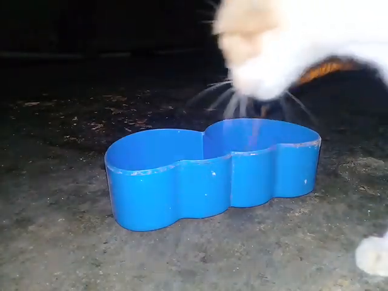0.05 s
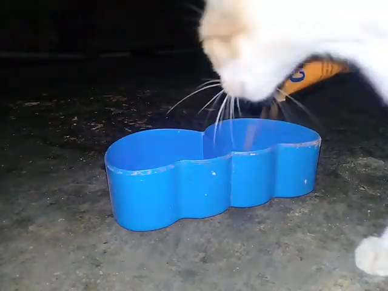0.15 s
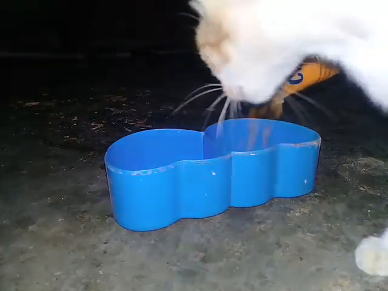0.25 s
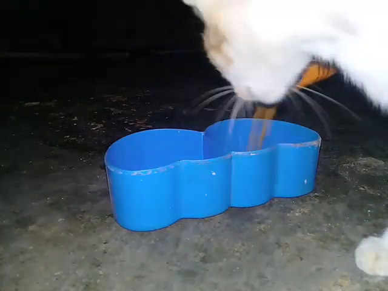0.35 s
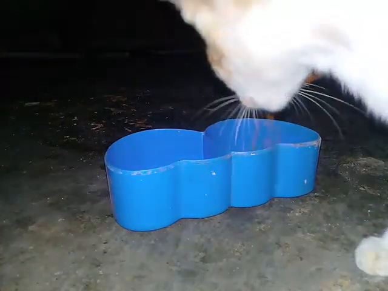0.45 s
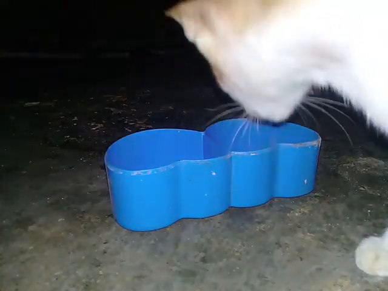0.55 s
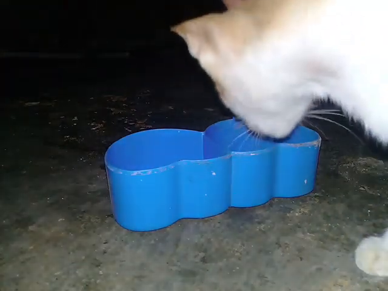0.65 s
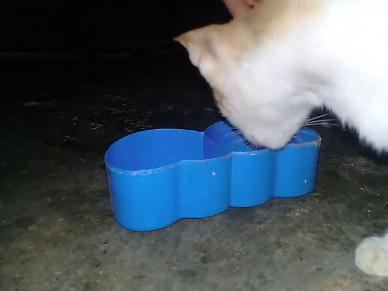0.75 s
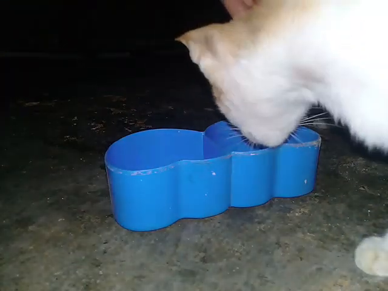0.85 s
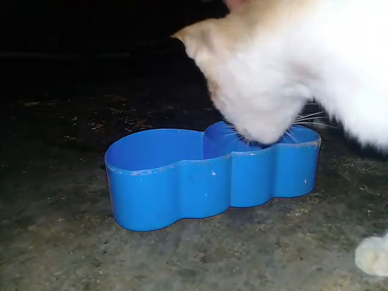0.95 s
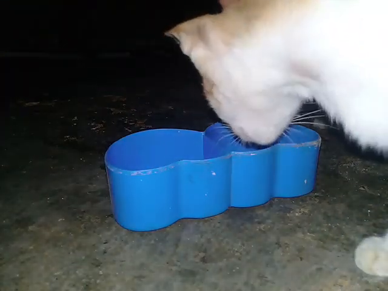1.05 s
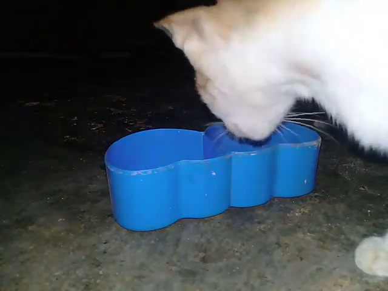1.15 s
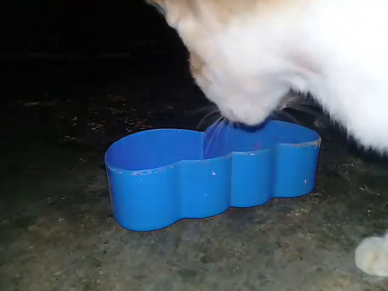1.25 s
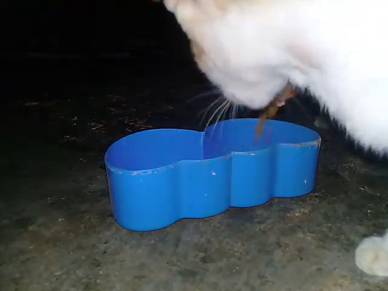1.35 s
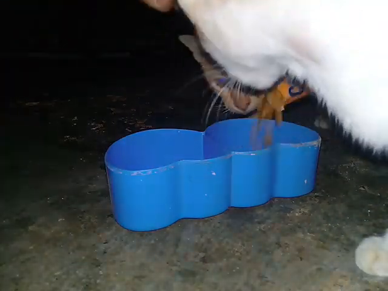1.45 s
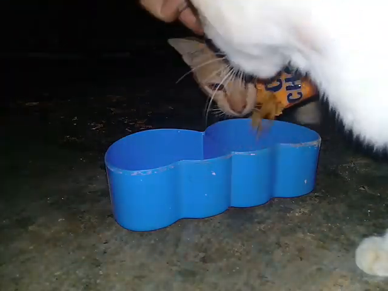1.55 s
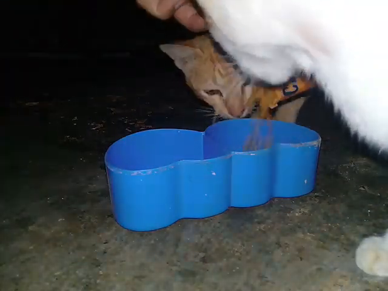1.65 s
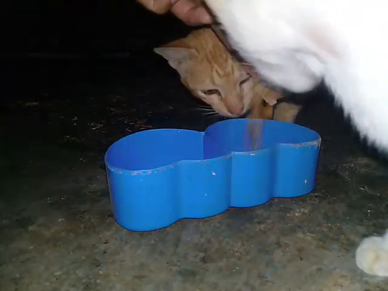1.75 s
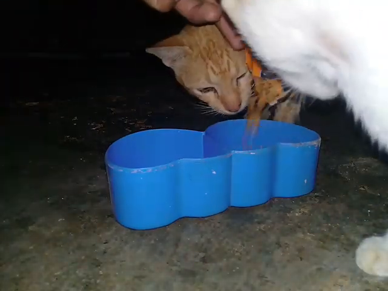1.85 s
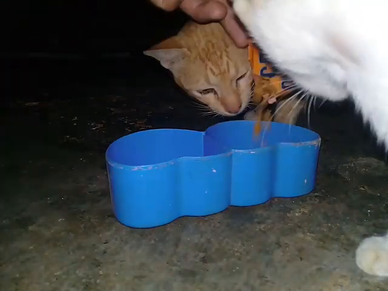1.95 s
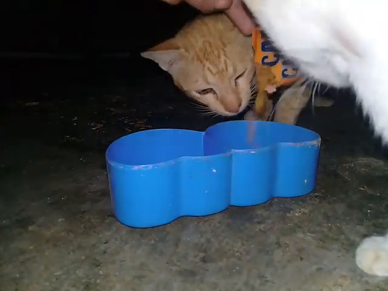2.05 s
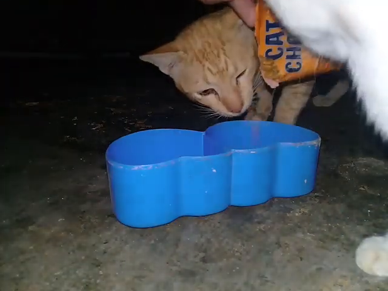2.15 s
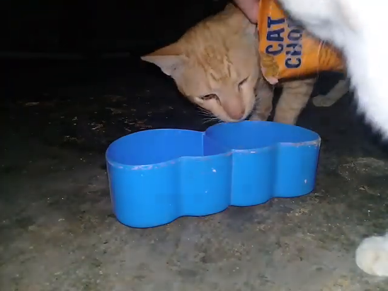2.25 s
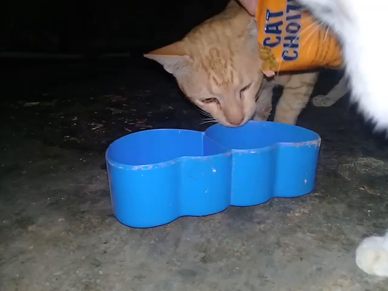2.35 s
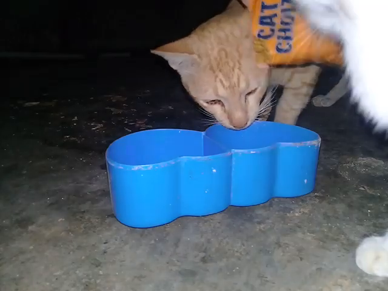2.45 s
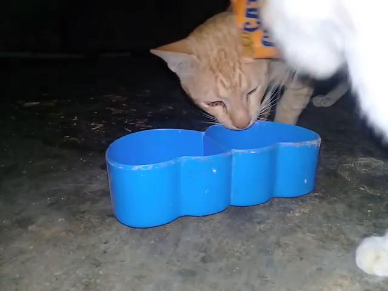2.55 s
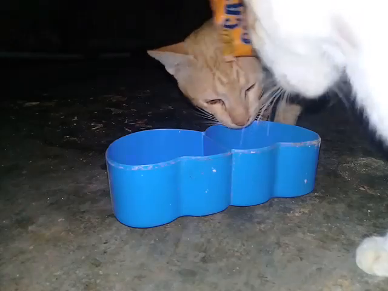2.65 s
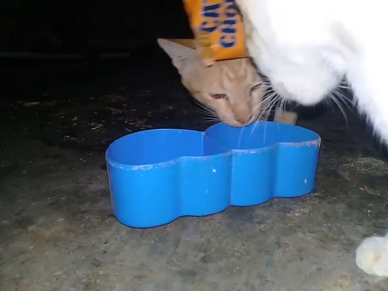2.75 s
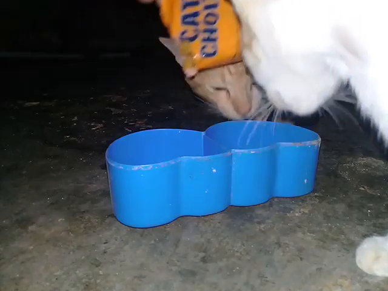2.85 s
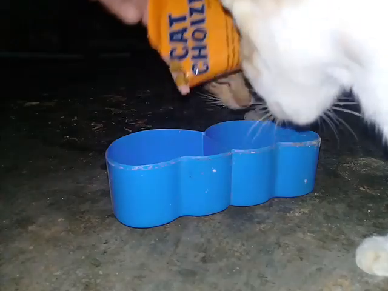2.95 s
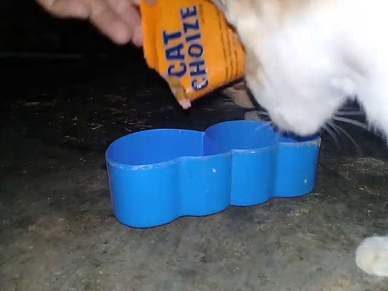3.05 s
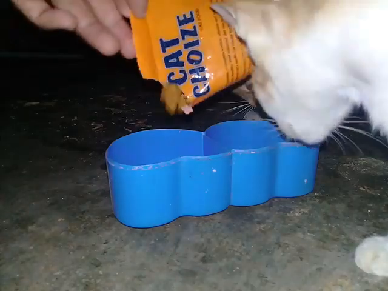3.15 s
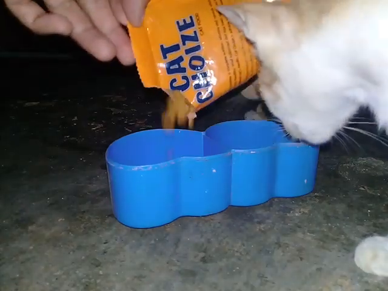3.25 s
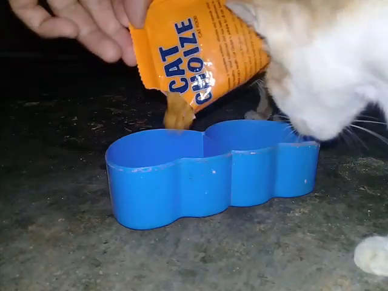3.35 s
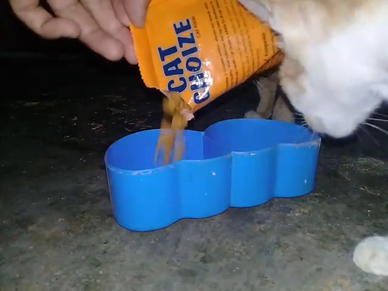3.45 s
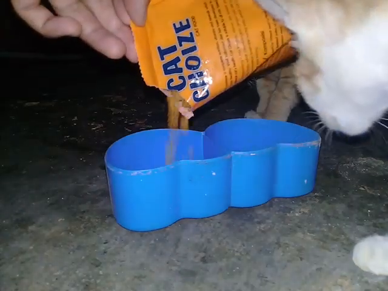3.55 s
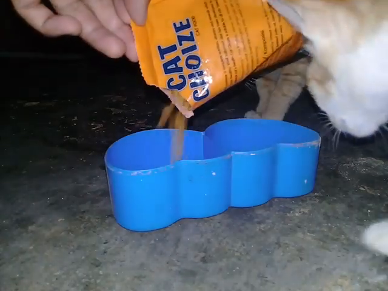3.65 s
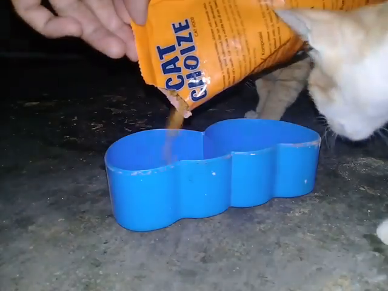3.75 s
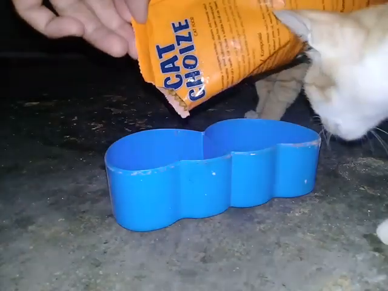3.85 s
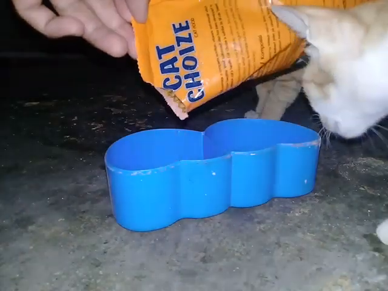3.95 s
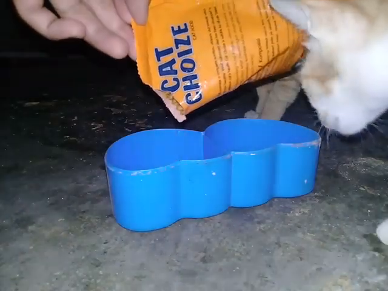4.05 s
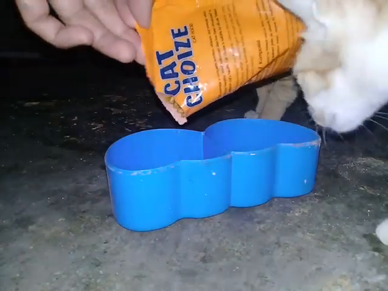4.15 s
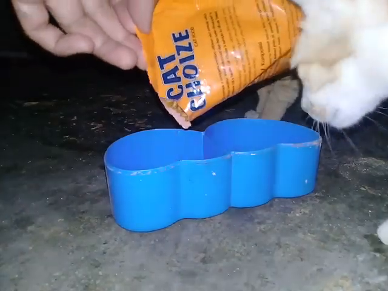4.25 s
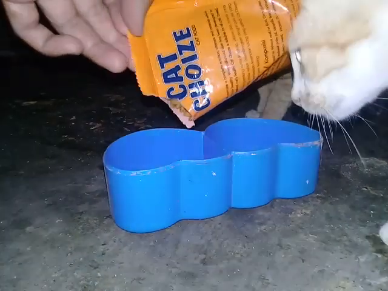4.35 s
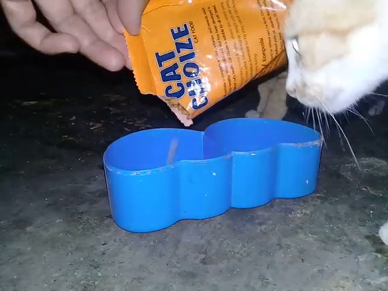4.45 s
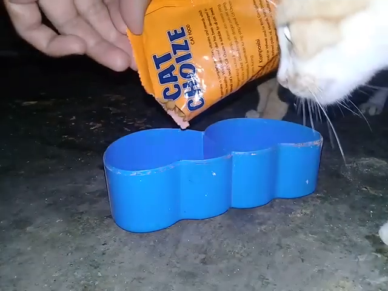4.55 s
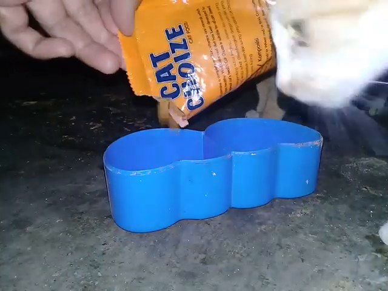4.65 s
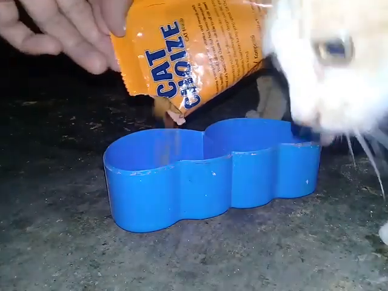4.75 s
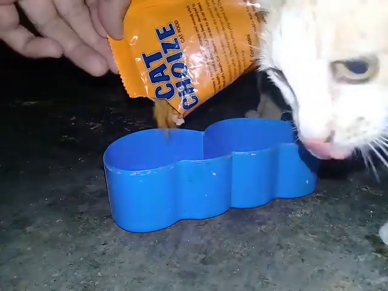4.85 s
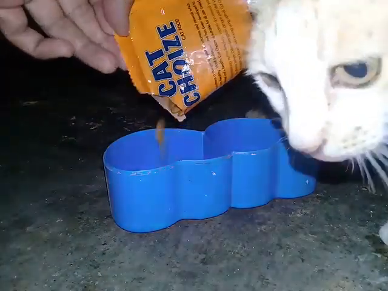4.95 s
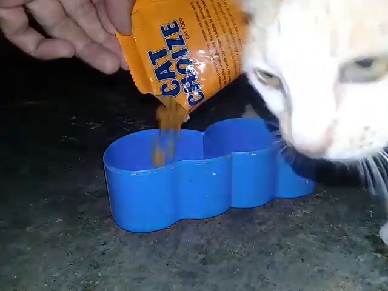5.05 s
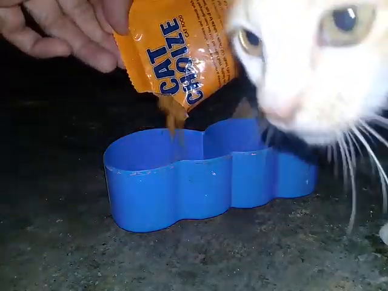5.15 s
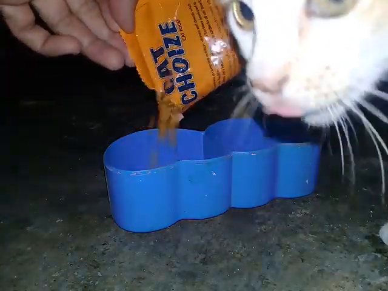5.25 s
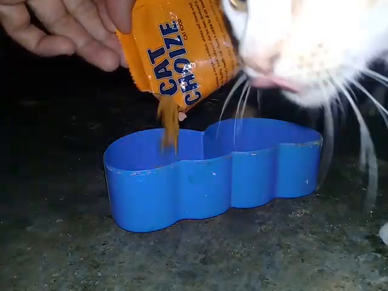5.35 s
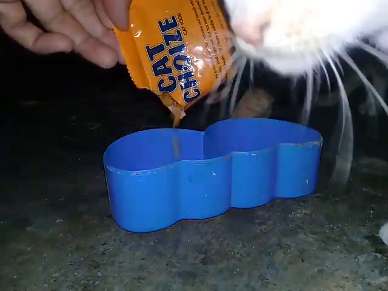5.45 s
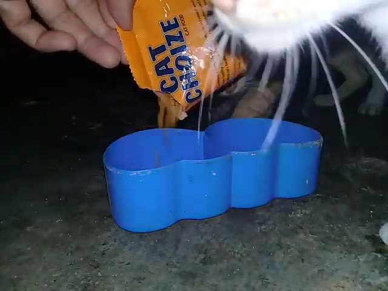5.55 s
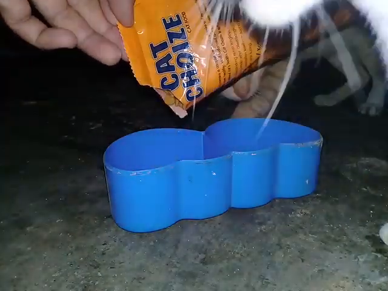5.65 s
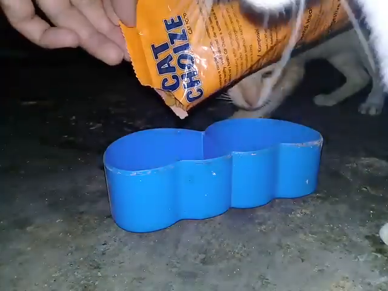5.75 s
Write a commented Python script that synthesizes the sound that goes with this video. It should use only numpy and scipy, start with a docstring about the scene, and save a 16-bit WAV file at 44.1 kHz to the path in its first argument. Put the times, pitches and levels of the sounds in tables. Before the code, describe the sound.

A plastic pouch rustles and crinkles while dry pellets rattle into one hard plastic cup, then another, with dull bumps and sharp snaps.

```python
"""From the start a far engine drones over low room noise, and a gripped plastic pouch rustles and crinkles.
Dry cat food soon drops into one plastic cup, then from about 3.3 s into a second: pellets click and ring it.
Streams of small hits patter and grow duller as food heaps up; the pouch gives dull bumps and snaps throughout.
Clicks, rustle and bumps are shaped noise; cup rings and engine are sines; a hard-walled room answers."""
import sys
import numpy as np
from scipy import signal
from scipy.fft import rfft, irfft
from scipy.io import wavfile
from scipy.ndimage import uniform_filter1d, minimum_filter1d

SR = 44100
rng = np.random.default_rng(int(sys.argv[2]) if len(sys.argv) > 2 else 0)


def unload_audio(sound):
    """Save the sound as a 16-bit wav file, at the path given as the first command line argument."""
    columns = np.transpose(np.atleast_2d(sound))
    # keep every value between -1 and 1, then stretch to whole-number steps
    steps = np.round(np.clip(columns, -1, 1) * 32767)
    wavfile.write(sys.argv[1], SR, steps.astype(np.int16))


N = 255780  # length in samples

# colour of the still air in the room: (frequency [Hz], relative level [dB])
AIR_SPECTRUM = [(25, -30), (50, -14), (80, -2), (130, 0), (220, -5.5), (330, -12), (450, -22.5),
                (700, -26.5), (1000, -35), (1600, -40), (7000, -43.5), (16000, -45.5)]
# a far engine pulling through its gears: (time [s], firing rate [Hz])
ENGINE_RATE = [(0, 81), (.45, 79), (.65, 91), (.95, 94), (1.5, 71), (2.9, 85), (3.15, 77), (4.7, 86),
               (5.8, 85)]
# the engine's tones: (multiple of the firing rate [], level at the start [dB])
ENGINE_TONES = [(3, -50), (4, -56)]
# the hand shifts its grip and the pouch rubs: (time [s], length [s], relative level [dB])
GRIPS = [(0, .62, -37.5), (.95, 0.97, -37.5), (2.5, 0.4, -69), (3.22, 0.13, -45.5), (3.33, 0.57, -39.5),
         (4.24, 0.011, -42.5), (4.43, 0.39, -43.5), (4.78, .45, -38.5), (5.3, .15, -34)]
# colour of the rubbing film: (frequency [Hz], relative level [dB])
RUSTLE_SPECTRUM = [(60, -26), (130, -2), (260, 4.5), (430, -6), (700, 5), (1400, -6), (3500, -13),
                   (6000, -25), (16000, -34.5)]
# colour of a snap or tiny tick of the film: (frequency [Hz], relative level [dB])
SNAP_SPECTRUM = [(400, -11), (1000, 2.5), (2300, 1), (3300, 4), (4500, 0), (7000, -12), (16000, -24)]
# single pellet hits that stand out from the patter, loud and soft: (time [s], relative level [dB])
SINGLE_PELLETS = [(0.141, -2), (0.191, -2.5), (0.219, -2.5), (0.232, -1), (0.256, -2), (0.291, -4),
                  (0.302, -3.5), (0.344, -1), (0.35, -4), (0.383, -2.5), (0.41, -5), (0.547, -3.5),
                  (0.569, -6), (0.64, -6), (0.734, -14.5), (0.994, -10.5), (1.059, -3.5), (1.086, -16.5),
                  (1.105, -4.5), (1.158, -3), (1.165, -2), (1.2, -6.5), (1.211, 0.5), (1.308, -10.5),
                  (1.377, -9.5), (1.471, -11), (1.495, -3.5), (1.627, -15), (1.946, -11.5), (1.996, -9),
                  (2.215, -17), (2.224, -16), (2.253, -21.5), (2.309, -23.5), (3.342, 4), (3.35, -3),
                  (3.372, -4), (3.387, -2.5), (3.421, -1.5), (3.432, 2.5), (3.528, 4), (3.538, 2.5),
                  (3.585, -5.5), (3.607, -3), (3.648, -8), (3.68, -4), (3.729, 0), (3.782, -1),
                  (3.818, -2.5), (3.843, -5.5), (3.868, -4), (3.894, -5.5), (3.915, -4.5), (3.964, -8),
                  (4.56, -9), (4.588, -8), (4.821, -8.5), (4.835, -6), (4.934, -10), (5.01, -6.5),
                  (5.028, -9), (5.067, -4.5)]
# colour of a pellet's click: (frequency [Hz], relative level [dB])
CLICK_SPECTRUM = [(100, -47), (430, -31), (650, -5), (1000, 0.5), (1400, 6), (2400, 9.5), (2900, 3),
                  (3250, -4.5), (4200, -3.5), (7000, -16), (11000, -18.5), (16000, -27.5)]
# resonances of the first cup: (frequency [Hz], width [Hz], relative level [dB])
# the decay treats any width below 70 Hz as 70 Hz, in both cups
RIGHT_CUP_MODES = [(670, 71, -13.5), (1372, 60, -1), (1590, 45, -13), (2310, 60, 7.5), (2546, 41, -5),
                   (2808, 36, 2), (3720, 240, 3), (4300, 250, -18)]
# dull bumps of the shaken pouch: (time [s], peak of the low thud [dB],
# hollow part against the thud, before a shared lift of 7 dB [dB])
BUMPS = [(0.279, -27, -3), (0.993, -23, -4.5), (1.014, -38.5, 9.5), (1.113, -21, -20), (1.263, -25, 2),
         (1.279, -32.5, 3), (1.71, -25.5, -3), (4.83, -23.5, -3.5), (5.316, -21, -4), (5.357, -31, -21),
         (5.478, -30.5, -3)]
# each tip of the pouch lets a slug of food slide out: (time [s], length [s], relative level [dB])
POURS = [(.28, .09, -29), (.39, .28, -18), (1.1, .24, -33), (1.52, .8, -22), (3.35, .03, -26),
         (3.435, .035, -19), (3.54, .18, -17), (3.78, .17, -26), (4.835, .055, -23.5), (4.94, .015, -32),
         (5.02, .04, -27), (5.19, .42, -28), (5.71, .025, -42)]
# the pouch buckles with a snap: (time [s], peak level [dB])
SNAPS = [(0.939, -24), (2.342, -27), (2.368, -28.5), (3.121, -54), (4.236, -35), (4.421, -33), (4.46, -27),
         (4.787, -16), (5.167, -19), (5.339, -11), (5.447, -20.5), (5.576, -20), (5.589, -14.5),
         (5.734, -32)]
# resonances of the second cup: (frequency [Hz], width [Hz], relative level [dB])
LEFT_CUP_MODES = [(633, 41, -16), (1280, 30, -4.5), (1649, 22, 2.5), (2100, 52, -5), (2850, 47, 5.5),
                  (3310, 52, 1), (4007, 57, -5.5), (4730, 150, -9.5)]
# how long the room's echo lasts: (frequency [Hz], time to fall 60 dB [s])
ROOM_DECAY = [(150, 0.41), (700, 0.26), (2500, 0.35), (6000, 0.28), (15000, 0.065)]

RECEDE_DB_PER_S = 3  # the engine draws away
GRIP_RISE_DB_PER_S, GRIP_EASE_DB_PER_S, GRIP_STOP_DB_PER_S = 260, 1, 68.5
CRINKLE_DB, CRINKLE_SPREAD_DB = -1.5, 6.5  # weakest tick against the grip, scatter above it
BOUNCE_S, BOUNCE_LOSS_DB = .009, 14  # mean time to the hop's landing, and its loss of level
CRACK_S, CRACK_DB = .004, 1.5  # first instant of contact: time to fall 60 dB, level over the rest
HEAP_DB_PER_S = 12  # food covers the plastic: treble lost per second of pouring
SOFTENING = 0.55  # share of that loss that also reaches the upper middle
# a slug arrives almost at once, thins out, then trickles off
POUR_RISE_DB_PER_S, POUR_THIN_DB_PER_S, POUR_STOP_DB_PER_S = 901.5, 29.5, 220
CROWDING = .28  # landings per second grow as the flow's amplitude to this power
SWITCH_S = 3  # hits and pours after this time belong to the second cup
LIMIT_DB, LIMIT_S = -.6, .001  # limiter ceiling, and its reach to either side
TOP_HZ = 15900  # the microphone's band limit


def amp(db):
    """Turn decibels into a gain."""
    return 10 ** (np.asarray(db) / 20)


def unit(x):
    """Scale each row to an average strength (rms) of 1."""
    return x / np.sqrt(np.mean(x ** 2, axis=-1, keepdims=True) + 1e-20)


def crest(x):
    """Scale each row to a peak of 1."""
    return x / (np.abs(x).max(axis=-1, keepdims=True) + 1e-12)


def along(points, hz):
    """Read a (frequency, value) curve on a logarithmic frequency axis."""
    f, v = np.transpose(points)
    return np.interp(np.log(hz + 1), np.log(f + 1), v)


def at(rows, s):
    """Read a (time, value) curve at the times s."""
    return np.interp(s, *np.transpose(rows))


def coloured(x, spectrum, size=1024):
    """Filter each row to this spectrum, with no sound ahead of its cause (minimum phase)."""
    log_gain = np.log(amp(along(spectrum, np.fft.rfftfreq(size, 1 / SR))))
    cepstrum = irfft(log_gain)
    # folding the cepstrum forward puts the filter's energy at its start
    cepstrum[1:size // 2] *= 2
    cepstrum[size // 2 + 1:] = 0
    kernel = irfft(np.exp(rfft(cepstrum)))
    return signal.fftconvolve(x, kernel[None], axes=1)[:, :x.shape[1]]


def filtered(x, order, hz, kind="lowpass"):
    """Keep one side of a frequency, or the band between two."""
    return signal.sosfilt(signal.butter(order, hz, kind, fs=SR, output="sos"), x)


def hiss(spectrum):
    """Steady noise of this colour and rms 1."""
    gain = amp(along(spectrum, np.fft.rfftfreq(N, 1 / SR)))
    return unit(irfft(rfft(rng.standard_normal(N)) * gain, N))


def bursts(times, t, t60):
    """One puff of noise per event, falling 60 dB in t60 seconds."""
    return rng.standard_normal((len(times), len(t))) * amp(-60 * t / t60)


def placed(times, sounds):
    """Lay each row of sound out at its own time and add them up."""
    start = np.round(np.abs(times) * SR).astype(int)
    index = start[:, None] + np.arange(sounds.shape[1])
    return np.bincount(index.ravel(), sounds.ravel(), N)[:N]


def gestures(rows, rise, sag, stop):
    """Gain of strokes that rise to their start, sag while they last, then stop (slopes in dB per second)."""
    clock = np.arange(N) / SR
    curves = []
    for s, length, level in rows:
        before = rise * np.maximum(s - clock, 0)
        while_on = sag * np.clip(clock - s, 0, length)
        after = stop * np.maximum(clock - s - length, 0)
        curves.append(level - before - while_on - after)
    return amp(np.max(curves, axis=0))


def during(rows, start, end):
    """The events that begin between two times."""
    return np.array([row for row in rows if start < row[0] < end])


def background():
    """Low room noise, and a far engine: sines that follow its drifting speed and waver as it draws away."""
    clock = np.arange(N) / SR
    turns = np.cumsum(at(ENGINE_RATE, clock)) / SR
    drone = np.zeros(N)
    for multiple, db in ENGINE_TONES:
        waver = 1 + .2 * hiss([(2, 0), (12, -40), (100, -120)])
        drone += amp(db) * waver * np.sin(2 * np.pi * multiple * turns)
    return drone * amp(-RECEDE_DB_PER_S * clock) + amp(-55.0) * hiss(AIR_SPECTRUM)


def grip_effort():
    """How strongly the hand works the pouch, as a gain per sample."""
    return gestures(GRIPS, GRIP_RISE_DB_PER_S, GRIP_EASE_DB_PER_S, GRIP_STOP_DB_PER_S)


def rub(effort):
    """The film rubs in uneven grains: noise whose level keeps drifting to a new random value every 3 ms."""
    clock = np.arange(N) / SR
    knots = np.arange(0, N / SR, .003)
    grain = amp(3.1 * np.interp(clock, knots, rng.standard_normal(len(knots))))
    rustle = coloured((grain * rng.standard_normal(N))[None], RUSTLE_SPECTRUM)[0]
    return amp(-3.0) * effort * unit(rustle)


def crinkles(effort, count=170, size=512):
    """Tiny creases give way at random moments, ticking in step with the strength of the grip."""
    place, chance = rng.uniform(.001, .999, (count, 2)).T
    s = place * N / SR
    # most ticks are weak, a few much stronger
    db = CRINKLE_DB + CRINKLE_SPREAD_DB * np.minimum(-np.log(chance), 2)
    ticks = crest(coloured(bursts(s, np.arange(size) / SR, t60=0.007), SNAP_SPECTRUM))
    strength = amp(db) * effort[(s * SR).astype(int)]
    return placed(s, strength[:, None] * ticks)


def muffling(pours, times):
    """Treble lost (dB) to the food that has heaped up by these times."""
    return HEAP_DB_PER_S * sum(np.clip(times - s, 0, length) for s, length, _ in pours)


def landings(times, cup, bare_db, heap_db, click_t60, ring_db, size=1500):
    """Pellet hits: a hard click, and the cup's modes, stirred differently at each spot."""
    t = np.arange(size) / SR
    hz, width, db = np.transpose(cup)
    # a wider resonance dies faster
    decay = np.exp(-np.pi * np.maximum(width, 70)[:, None] * t)
    modes = np.sin(2 * np.pi * hz[:, None] * t) * decay
    ring = (rng.standard_normal((len(times), len(hz))) * amp(db) * np.sqrt(width)) @ modes
    contact = bursts(times, t, click_t60) + amp(CRACK_DB) * bursts(times, t, CRACK_S)
    click = coloured(contact, CLICK_SPECTRUM)
    body = filtered(click, 4, 5000)
    treble = filtered(click, 4, 5000, "highpass")
    knock = unit(body) + amp(ring_db) * unit(ring)
    # heaped food cushions the landing
    dull = filtered(knock, 1, 1100)
    knock = dull + amp(-SOFTENING * heap_db)[:, None] * (knock - dull)
    # plastic damps the treble first
    treble = treble * amp(-60 * t / 0.051)
    # a pellet that lands on its edge clicks brighter than one that lands flat
    treble_db = bare_db - heap_db + 3 * rng.standard_normal(len(times))
    return unit(knock) + amp(treble_db)[:, None] * unit(treble)


def pellets(hits, pours, cup, gain_db, bare_db, ring_db):
    """Single pellets that stand out from the patter: each hits and hops once, landing again more softly."""
    s, db = hits.T
    s = np.concatenate([s, s + BOUNCE_S * rng.uniform(.5, 1.5, len(s))])
    db = np.concatenate([db, db - BOUNCE_LOSS_DB])
    clicks = landings(s, cup, bare_db, muffling(pours, s), click_t60=0.019, ring_db=ring_db)
    return placed(s, amp(db + gain_db)[:, None] * unit(clicks))


def bumps(size=4096):
    """The shaken pouch bumps dully: a low thud and a hollow middle part, both short bands of noise."""
    t = np.arange(size) / SR
    s, db, hollow_db = np.transpose(BUMPS)
    thud = crest(filtered(bursts(s, t, t60=0.046), 2, [119, 268], "bandpass"))
    hollow = crest(filtered(bursts(s, t, t60=0.04), 2, [480, 950], "bandpass"))
    both = thud + amp(hollow_db + 7.0)[:, None] * hollow
    return placed(s, amp(db)[:, None] * both)


def stream(pours, cup, gain_db, bare_db, ring_db, count):
    """Many small landings: crowded in a full flow, single ticks in a thin one."""
    flow = gestures(pours, POUR_RISE_DB_PER_S, POUR_THIN_DB_PER_S, POUR_STOP_DB_PER_S)
    # expected landings in each sample
    density = flow ** CROWDING
    density = density * count / density.sum()
    # each pellet falls when the running count reaches its slightly shuffled turn
    turn = np.clip(np.arange(count) + rng.uniform(-.5, 1.5, count), .5, count - .5)
    index = np.searchsorted(np.cumsum(density), turn)
    s = index / SR
    weight = unit(amp(6.5 * np.clip(rng.standard_normal(count), -2, 1.3)))
    hits = unit(landings(s, cup, bare_db, muffling(pours, s), click_t60=0.021, ring_db=ring_db))
    # together the hits have the power that the flow asks for
    strength = weight * flow[index] / np.sqrt(density[index] * hits.shape[1])
    return amp(gain_db) * placed(s, hits * strength[:, None])


def right_cup():
    """The first helping: single pellets and streams strike the right cup's resonances."""
    hits, pours = during(SINGLE_PELLETS, 0, SWITCH_S), during(POURS, 0, SWITCH_S)
    singles = pellets(hits, pours, RIGHT_CUP_MODES, gain_db=-19.5, bare_db=-7, ring_db=-1.0)
    return singles + stream(pours, RIGHT_CUP_MODES, gain_db=0.5, bare_db=-5.5, ring_db=-3, count=380)


def snaps(size=4096):
    """The film buckles at its creases: short bright bursts of noise."""
    s, db = np.transpose(SNAPS)
    cracks = coloured(bursts(s, np.arange(size) / SR, t60=0.035), SNAP_SPECTRUM)
    return placed(s, amp(db)[:, None] * crest(cracks))


def left_cup():
    """The second helping: single pellets and streams strike the left cup's resonances."""
    hits, pours = during(SINGLE_PELLETS, SWITCH_S, N / SR), during(POURS, SWITCH_S, N / SR)
    singles = pellets(hits, pours, LEFT_CUP_MODES, gain_db=-19.5, bare_db=-8.5, ring_db=-6.0)
    return singles + stream(pours, LEFT_CUP_MODES, gain_db=0, bare_db=-9, ring_db=-1.0, count=380)


def tail():
    """A diffuse room response of energy 1: noise that dies at its own pace in each frequency band."""
    hz, t, z = signal.stft(rng.standard_normal(SR * 2 // 3), SR, nperseg=256)
    colour_db = along([(200, -2.5), (2500, -2.5), (6000, -1.5), (14000, 0.0)], hz)
    fade_db = 60 * t / along(ROOM_DECAY, hz)[:, None]
    echo = signal.istft(z * amp(colour_db[:, None] - fade_db), SR, nperseg=256)[1]
    # the echo swells in over about a millisecond
    echo *= 1 - np.exp(-np.arange(len(echo)) / SR / 0.00063)
    return echo / np.linalg.norm(echo)


def room(x, size=6000):
    """The room's echo: each short stretch gets a freshly drawn noise tail, so no fixed tones build up."""
    wet = np.zeros(N + SR)
    for start in range(0, N, size):
        echo = signal.fftconvolve(x[start:start + size], tail())
        wet[start:start + len(echo)] += echo
    return wet[:N]


def scene():
    """The pouch and both helpings, with the room's answer, over the background."""
    effort = grip_effort()
    pouch = rub(effort) + crinkles(effort) + bumps() + snaps()
    near = pouch + right_cup() + left_cup()
    return (near + amp(-10.0) * room(near) + background())[None]


def record(dry):
    """A fast limiter holds the loudest peaks; the small microphone drops deep bass and the highest treble."""
    span = 2 * round(LIMIT_S * SR) + 1
    needed = np.minimum(1, amp(LIMIT_DB) / (np.abs(dry) + 1e-9))
    held = dry * uniform_filter1d(minimum_filter1d(needed, span), span)
    thin = filtered(held, 4, 62, "highpass")
    return irfft(rfft(thin) * (np.fft.rfftfreq(N, 1 / SR) < TOP_HZ), N)


dry = scene()
out = record(dry)
unload_audio(out)
```